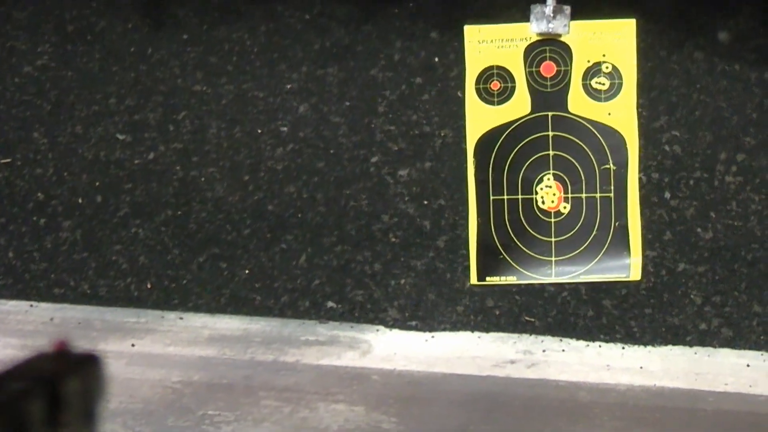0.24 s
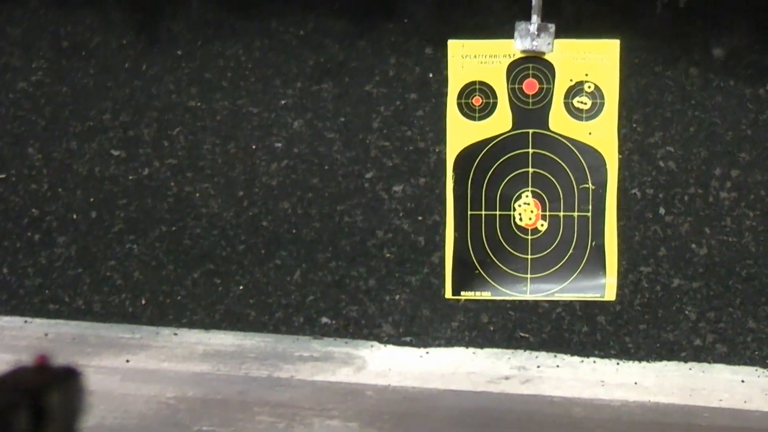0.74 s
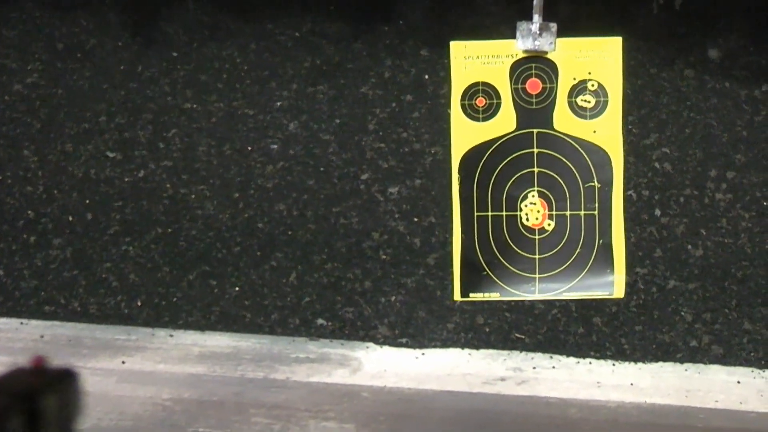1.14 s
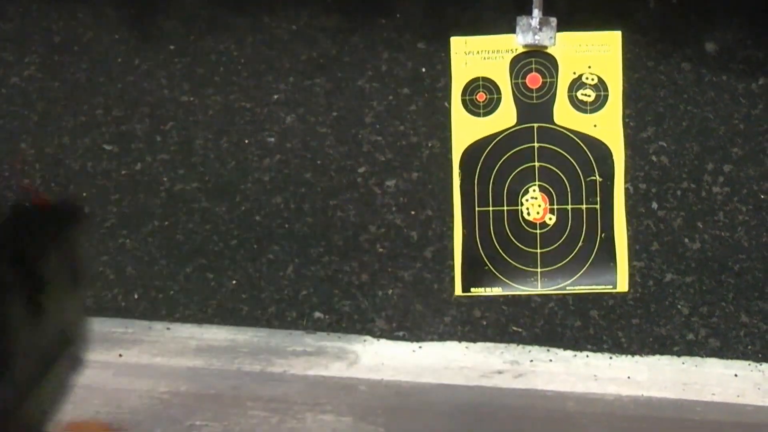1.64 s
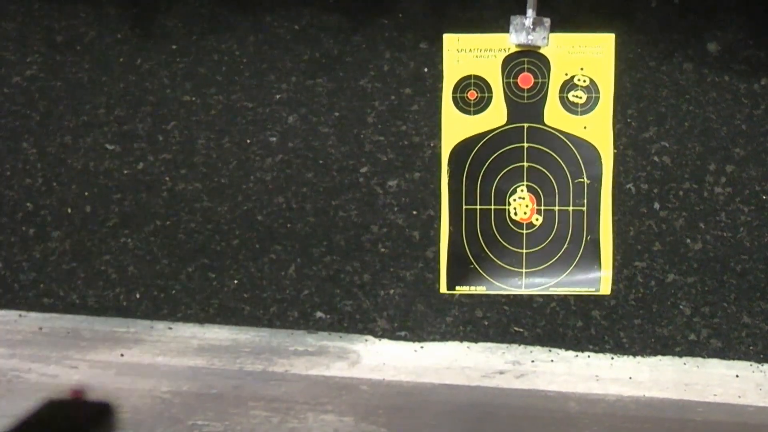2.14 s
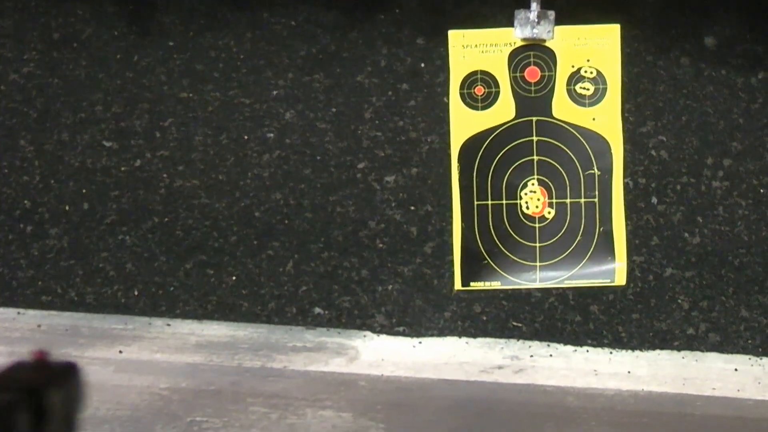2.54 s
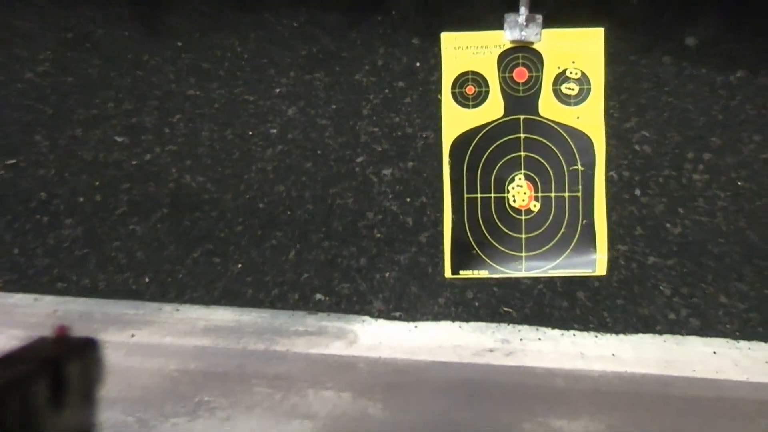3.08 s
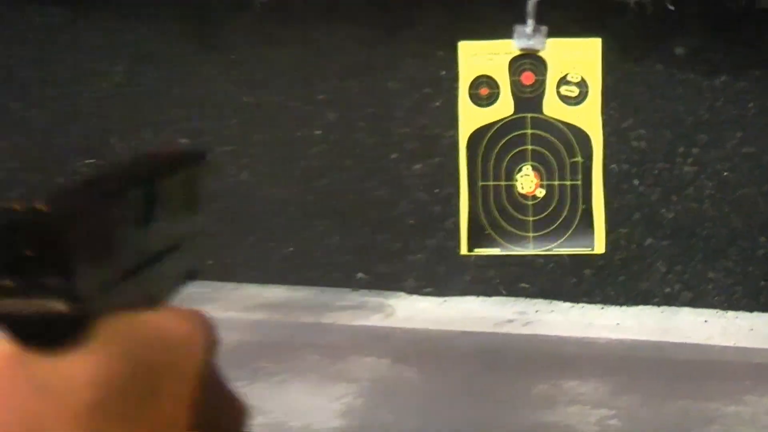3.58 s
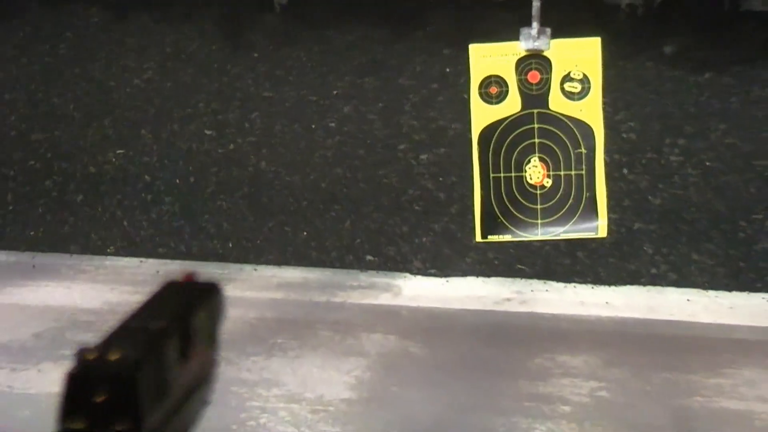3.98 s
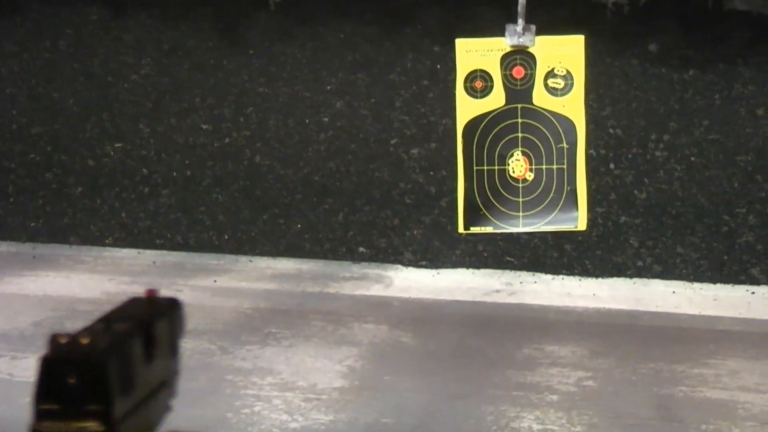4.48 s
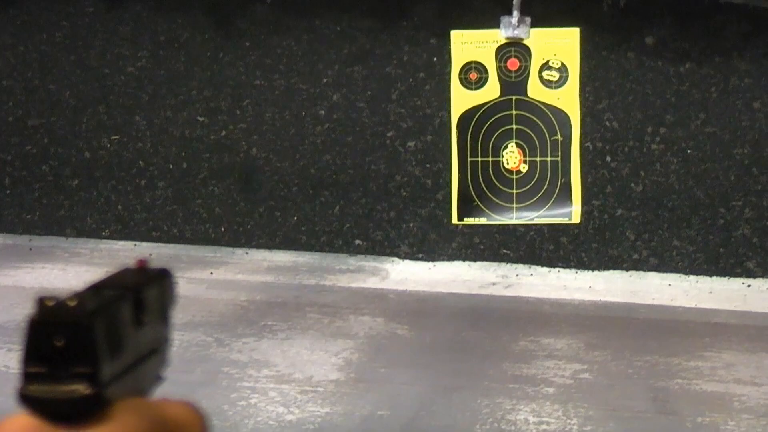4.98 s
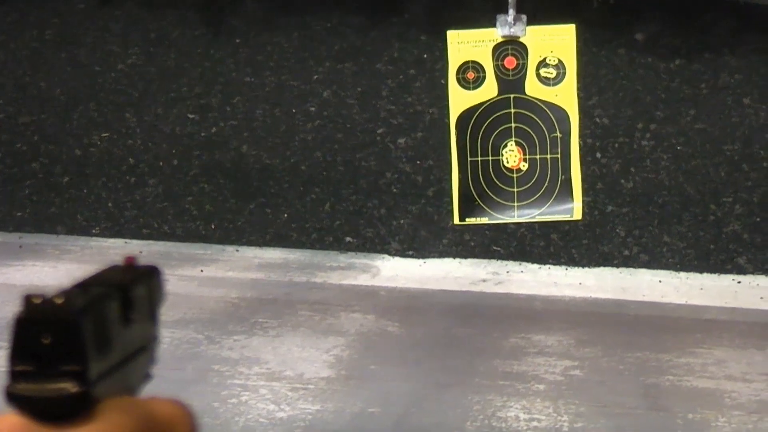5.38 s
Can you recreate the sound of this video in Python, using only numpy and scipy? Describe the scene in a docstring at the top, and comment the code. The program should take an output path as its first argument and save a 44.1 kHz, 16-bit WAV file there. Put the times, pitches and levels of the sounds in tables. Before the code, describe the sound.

Handgun blasts overload a close camera microphone, each rolling into a boomy concrete echo, with tinkling spent cases and fan hum between.

```python
"""Handgun blasts crack and roar through a long concrete range, near a camera; brass rings on the floor.
Each shot is shaped noise: crack, boom, hall roar, drone and far-wall slap, plus a sine thump.
Spent cases are noise ticks with decaying sine modes; soft bumps are low noise bursts.
Ventilation is filtered noise under a wavering fan tone.
Both microphones overload on blasts; the camera's limiter cuts the level, then releases steadily."""
import sys
import numpy as np
from scipy import signal
from scipy.fft import rfft, irfft, next_fast_len
from scipy.io import wavfile
from scipy.ndimage import uniform_filter1d, minimum_filter1d, map_coordinates

SR = 44100
rng = np.random.default_rng(int(sys.argv[2]) if len(sys.argv) > 2 else 0)


def wrap_up_sound(samples):
    """Save the sound to the file named by the first command line argument, as 16-bit audio."""
    columns = np.atleast_2d(samples).T
    # keep every value between -1 and 1, then stretch to whole-number steps
    tamed = np.clip(columns, -1, 1)
    steps = np.round(tamed * 32767).astype(np.int16)
    wavfile.write(sys.argv[1], SR, steps)


N = 247842
MATURE_S = 0.6  # reference time of the roar and drone decays
TOP_HZ = 15870  # band limit

# Shots: [t/s, level/dB common to all parts, gun]; a negative t leaves only the tail
SHOT_LIST = [(-.55, -19.5, "far"), (1.237, -15.5, "far"), (1.504, -22.5, "near"), (2.860, -15.5, "far"),
             (3.555, -26, "near"), (5.012, -15, "far")]
# Guns beside the camera and some lanes away: [bass/dB, booth/dB, build-up/s, crack/dB, boom/dB,
# thump/dB, far wall/dB]; part levels add to the shot level, negative build-up means immediate
GUN_PARTS = {"near": (-1.5, 23, -0.0071, 50, 38.5, 49, 30.5),
             "far": (-11.5, 10, 0.01, 34.5, 31.5, 37, 24.5)}


def shots():
    """A blast sends a direct front, then wall echoes and a diffuse roar, all scaled by its level."""
    out = np.zeros((2, N))
    t = np.arange(2 * SR) / SR
    for start_s, level_db, gun in SHOT_LIST:
        bass_db, booth_db, rise_s, crack_db, boom_db, thump_db, wall_db = GUN_PARTS[gun]
        # walls between gun and camera soften the front
        front = (1 - np.exp(-t / np.clip(rise_s, 1e-4, 1))) ** 3
        blast = crack(t, crack_db) + boom(t, boom_db) + thump(t, thump_db)
        hall = roar(len(t), bass_db, booth_db) + drone(t) + far_wall(t, wall_db)
        add(out, start_s, amp(level_db) * front * (blast + hall))
    return out


# Crack and far-wall colour: [f/Hz, relative density/dB]
CRACK_COLOUR = [(300, -23), (2000, -2.5), (5500, -4), (9000, -10.5), (16000, -25)]
# Likeness of first arrivals: [f/Hz, left-right correlation, clipped to -1..1]
EARLY_LIKENESS = [(60, -0.18), (180, -1.6), (550, 0.82), (1650, -0.24), (4970, 0.92), (15000, 0.38)]


def crack(t, level_db):
    """The sharp front is bright noise with a short exponential decay."""
    return amp(level_db - 60 * t / 0.23) * hiss(CRACK_COLOUR, len(t), EARLY_LIKENESS)


def far_wall(t, level_db, delay_s=0.135):
    """The far wall returns a late slap with the colour of the crack."""
    late_s = np.maximum(t - delay_s, 0)
    envelope = amp(level_db - 60 * late_s / 0.3) * (1 - np.exp(-late_s / 0.0033))
    return envelope * hiss(CRACK_COLOUR, len(t), EARLY_LIKENESS)


# Boom colour: [f/Hz, relative density/dB]
BOOM_COLOUR = [(40, -32), (120, 4), (220, -4), (350, 5), (600, -38.5), (1200, -38)]


def boom(t, level_db):
    """The low body of the blast gathers within milliseconds and outlasts the crack."""
    envelope = amp(level_db - 60 * t / 0.48) * (1 - np.exp(-t / 0.0096)) ** 2
    return envelope * hiss(BOOM_COLOUR, len(t))


def thump(t, level_db, delay_s=0.056, centre_hz=299.6, width_s=0.011):
    """A low echo is a Gaussian sine burst whose pitch and phase vary by shot."""
    hz = centre_hz * rng.normal(1, 0.061)
    tone = np.sin(2 * np.pi * (hz * t + rng.random()))
    return amp(level_db) * np.exp(-((t - delay_s) / width_s) ** 2) * tone


# Roar source colour: [f/Hz, relative density/dB]
ROAR_COLOUR = [(18, -74.5), (30, -41), (106, -12.5), (153, -4), (227, -5.5), (382, -11), (842, -2.5),
               (1250, -10), (1600, -15), (1860, -14.5), (5650, -25), (7230, -29.5), (11000, -49.5),
               (14300, -94.5), (22000, -120)]
# Hall decay: [f/Hz, t60/s]
HALL_T60 = [(60, 2), (250, 0.78), (800, 1.252), (2500, 1.17), (6000, 1.033), (11000, 0.82)]
# Hall build-up: [f/Hz, time constant/s]
HALL_SWELL = [(100, 0.019), (800, 0.035), (4000, 0.018)]


def roar(size, bass_db, booth_db):
    """Each frequency builds and dies in the hall at its own speed, in uneven lumps."""
    hz, t, bins = signal.stft(hiss(ROAR_COLOUR, size), SR, nperseg=128)
    decay = amp(-60 * (t - MATURE_S) / along(HALL_T60, hz)[:, None])
    swell = 1 - np.exp(-t / along(HALL_SWELL, hz)[:, None])
    booth = 1 + amp(booth_db - 60 * t / 1.01)  # walls around the gun add a part that dies sooner
    even = signal.istft(bins * decay * swell * booth, SR, nperseg=128)[1][:, :size]
    lumps = amp(1.1 * wobble(25.1, size))
    return lumps * filtered(even, lambda f: amp(bass_db / (1 + (f / 400) ** 2)))


# Slowest hall resonances: [f/Hz, relative density/dB]
DRONE_COLOUR = [(180, -32), (300, 2.5), (378, -22), (790, 3.5), (1380, -42), (1510, -29), (2000, -18.5),
                (2600, -55.5), (4400, -120)]


def drone(t, t60_s=1.6):
    """The slowest hall resonances linger as narrow-coloured noise."""
    return amp(-15.5 - 60 * (t - MATURE_S) / t60_s) * hiss(DRONE_COLOUR, len(t))


# Brass cases touching the floor: [t/s, tick level/dB, ring f/Hz, ring level/dB, landing]
CASE_LIST = [(.577, -48, 11450, -57.5, "free"), (1.058, -53, 11400, -61.5, "free"),
             (1.986, -30, 9000, -60, "dull"), (2.351, -34, 1900, -28, "dull"),
             (2.525, -48, 8000, -61, "dull"), (2.553, -36, 5480, -46, "dull"),
             (2.564, -37, 7970, -42, "dull"), (2.58, -37, 2300, -42, "dull"),
             (2.615, -54, 11400, -68, "free"), (2.669, -73, 8000, -52, "dull"),
             (2.818, -41, 5800, -49, "dull"), (3.43, -48, 11000, -56, "free"),
             (4.171, -25.5, 6960, -40.5, "free"), (4.23, -53, 7000, -63, "free"),
             (4.467, -55, 3530, -39, "dull"), (4.634, -52, 11000, -70, "free"),
             (4.666, -42.5, 4500, -62, "dull"), (4.726, -51, 7000, -65, "free"),
             (4.857, -44.5, 11200, -56, "free")]
# Ring decay of the base pitch by landing: [t60/s]; springing up rings on, landing flat damps
LANDING_T60 = {"free": .4, "dull": 0.039}


def cases():
    """A brass tube strikes the floor with a tick, then rings in its modes."""
    out = np.zeros((2, N))
    t = np.arange(SR) / SR
    for start_s, tick_db, ring_hz, ring_db, landing in CASE_LIST:
        ring = case_ring(t, ring_hz, ring_db, LANDING_T60[landing])
        add(out, start_s, case_tick(t, tick_db, ring_hz) + ring)
    return out


# Tick colour: [f/tick centre, relative density/dB]
TICK_COLOUR = [(.2, -29), (.6, -1), (1, -1), (1.6, -3), (3, -12), (6, -67)]


def case_tick(t, level_db, ring_hz):
    """Impact noise has a fast part and weaker scatter; its centre climbs with the ring pitch."""
    centre_hz = 5000 * (ring_hz / 7000) ** 0.45
    colour = [(ratio * centre_hz, db) for ratio, db in TICK_COLOUR]
    decay = amp(-60 * t / 0.012) + amp(-8.5 - 60 * t / 0.14)
    return amp(level_db) * (1 - np.exp(-t / 0.0016)) * decay * hiss(colour, len(t))


# Case modes: [f/ring f, relative level/dB]
CASE_MODES = [(1.001, 7), (1.3, -22), (1.48, -23), (1.76, -16), (1.92, -17)]


def case_ring(t, hz, level_db, t60_s):
    """Tube modes decay faster with pitch; those above the band limit are left out."""
    # a rolling case blurs its note
    drift_s = np.cumsum(rng.normal(0, 2e-6, (2, len(t))), axis=1)
    cycles = hz * (t + drift_s)
    modes = 0
    for ratio, db in CASE_MODES:
        if ratio * hz < TOP_HZ:
            modes = modes + amp(db - 60 * t * ratio / t60_s) * np.sin(2 * np.pi * ratio * cycles)
    return amp(level_db + 5.7 * wobble(42, len(t))) * (1 - np.exp(-t / 0.0033)) * modes


# Dull bumps, perhaps hands shifting on the camera: [t/s, level/dB]
BUMP_LIST = [(1.033, -38), (1.07, -38), (1.117, -36), (1.145, -43), (1.20, -47), (4.61, -50), (4.88, -44),
             (4.925, -45), (4.965, -45)]
# Bump colour: [f/Hz, relative density/dB]
BUMP_COLOUR = [(40, -25), (110, 5), (200, -4), (500, -24), (1000, -29), (5000, -25), (12000, -70)]


def bumps(rise_s=0.006, t60_s=0.075):
    """Soft low pushes are short noise bursts without a ring."""
    out = np.zeros((2, N))
    t = np.arange(SR // 4) / SR
    for start_s, level_db in BUMP_LIST:
        envelope = amp(level_db - 60 * t / t60_s) * (1 - np.exp(-t / rise_s))
        add(out, start_s, envelope * hiss(BUMP_COLOUR, len(t)))
    return out


# Background swell: [t/s, hum level/dB]
HUM_LEVEL = [(.7, -58), (1.0, -55.5), (1.06, -51), (1.2, -47), (2.5, -42), (2.75, -42), (4.5, -46),
             (4.8, -49.5), (4.95, -43)]


def background():
    """Ventilation noise swells and sinks; the low rumble follows part of its swings."""
    hum_db = np.interp(np.arange(N) / SR, *np.transpose(HUM_LEVEL))
    return amp(hum_db) * ventilation() + rumble(hum_db)


# Ventilation colour: [f/Hz, relative density/dB]
AIR_COLOUR = [(130, -17), (220, -4), (447, -4.5), (484, -8), (584, 1), (866, -2), (1530, -15.5),
              (5220, -33), (9500, -44), (12400, -69), (20900, -120)]
# Rustle colour: [f/Hz, relative density/dB]
RUSTLE_COLOUR = [(800, -25), (2000, 7), (5000, -1), (8000, -7), (12000, -26.5)]


def ventilation(rustle_db=-12):
    """Ventilation hum is coloured noise with a lighter rustle above."""
    return hiss(AIR_COLOUR, N) + amp(rustle_db) * hiss(RUSTLE_COLOUR, N)


# Low rumble colour: [f/Hz, relative density/dB]
DUCT_COLOUR = [(12, -83), (20, -52), (49, -11), (108, -9), (156, -12), (230, -18), (300, -53), (510, -120)]
# Fan tone: [f/Hz, level/dB before normalising]
FAN_TONES = [(145.3, -59.5)]


def rumble(hum_db, mean_db=-50.5, follow_db_per_db=0.41, waver_db=5):
    """Low noise carries a fan tone that wavers in level and phase."""
    t = np.arange(N) / SR
    tones = 0
    for hz, db in FAN_TONES:
        level = amp(db + waver_db * wobble(3.2, N))
        tones = tones + level * np.sin(2 * np.pi * hz * t + 1.8 * wobble(8.8, N))
    mix = unit(hiss(DUCT_COLOUR, N) + amp(-3.5) * unit(tones))
    return amp(mean_db + follow_db_per_db * (hum_db - hum_db.mean())) * mix


# Hall likeness: [f/Hz, left-right correlation]
HALL_LIKENESS = [(60, 0.99), (150, 1), (380, 0.99), (950, 0.93), (2380, 0.69), (5980, 0.77), (15000, 0.15)]
# Hall lean: [f/Hz, left minus right/dB]
HALL_LEAN = [(60, 1), (180, -0.5), (550, 1.5), (1650, 0.5), (4970, -1), (15000, 0)]


def hiss(spectrum, size, likeness=HALL_LIKENESS):
    """Stereo noise of rms 1: mid-side mixing sets correlation, opposite gains set lean."""
    def mid_side(hz):
        angle = np.arccos(np.clip(along(likeness, hz), -1, 1)) / 2
        return amp(along(spectrum, hz)) * [np.cos(angle), np.sin(angle)]

    def lean(hz):
        half_db = along(HALL_LEAN, hz) / 2
        return amp([half_db, -half_db])

    mid, side = filtered(rng.standard_normal((2, size)), mid_side)
    return unit(filtered(np.array([mid + side, mid - side]), lean))


def wobble(knots_per_s, size):
    """A smooth random curve through Gaussian knots."""
    knots = rng.standard_normal(int(size * knots_per_s / SR) + 4)
    return map_coordinates(knots, [np.arange(size) * knots_per_s / SR])


def amp(db):
    """dB to amplitude."""
    return 10 ** (np.asarray(db) / 20)


def unit(x):
    """Scale to rms 1."""
    return x / np.sqrt(np.mean(x ** 2) + 1e-20)


def along(points, hz):
    """Interpolate (f/Hz, value) points on a log-frequency axis."""
    f, v = np.transpose(points)
    return np.interp(np.log(hz + 1), np.log(f + 1), v)


def filtered(x, response):
    """Multiply the spectrum by a response of frequency, with zero padding."""
    size = next_fast_len(x.shape[-1] + 8192)
    spectrum = rfft(x, size) * response(np.fft.rfftfreq(size, 1 / SR))
    return irfft(spectrum, size)[..., :x.shape[-1]]


def add(out, start_s, sound):
    """Mix in a sound, trimmed at both ends of the scene."""
    at = round(start_s * SR)
    piece = sound[:, max(0, -at):][:, :N - max(0, at)]
    out[:, max(0, at):][:, :piece.shape[1]] += piece


def scene():
    """Sum everything that reaches the microphones."""
    return shots() + cases() + bumps() + background()


def limiter(x, ceiling_db, hold_s, release_db_per_s, smooth_s, overreact, settle_s):
    """One gain for both channels overshoots at sudden peaks, settles and releases steadily."""
    peak_db = 20 * np.log10(np.abs(x).max(axis=0) + 1e-9)
    over_db = np.maximum(peak_db - ceiling_db, 0)
    held_db = -minimum_filter1d(-over_db, max(1, round(hold_s * SR)))  # centred window
    ramp_db = release_db_per_s * np.arange(N) / SR
    released_db = np.maximum.accumulate(held_db + ramp_db) - ramp_db
    keep = np.exp(-1 / (settle_s * SR))
    settled_db = signal.lfilter([1 - keep], [1, -keep], released_db)
    cut_db = released_db + overreact * np.maximum(released_db - settled_db, 0)
    return x * amp(-uniform_filter1d(cut_db, max(1, round(smooth_s * SR))))


def widened(x, lift_db, corner_hz):
    """Close microphones differ little in the bass, so the camera lifts their difference there."""
    mid, side = (x[0] + x[1]) / 2, (x[0] - x[1]) / 2
    side = filtered(side, lambda hz: 1 + (amp(lift_db) - 1) / (1 + 1j * hz / corner_hz))
    return np.array([mid + side, mid - side])


# Microphone travel limits: one row each for left and right, [level/dB]
MIC_LIMIT_DB = [
    [7.5],
    [6],
]
# Clipping-point wander: [f/Hz, relative density/dB]
FLUTTER_COLOUR = [(20, -29), (60, -5), (130, 14), (400, 11), (2000, -16), (8000, -15), (16000, -31)]


def overload(dry):
    """Each microphone saturates around a wandering rest point that shows only in overloads."""
    def squash(u):
        return u / (1 + np.abs(u) ** 6.88) ** (1 / 6.75)

    top = amp(MIC_LIMIT_DB)
    rest = 0.11 * hiss(FLUTTER_COLOUR, N, [(100, -0.2)])
    return top * (squash(dry / top + rest) - squash(rest))


def amplifier(hz):
    """Response with a bass cut, a presence lift and a gentle treble roll-off."""
    bass_cut = (1j * hz / (50 + 1j * hz)) ** 3
    presence = 1 + 0.083 * 1j * hz * 5000 / (5500 ** 2 - hz ** 2 + 1j * hz * 5000)
    return bass_cut * presence / (1 + 1j * hz / 8000)


def record(dry):
    """Microphone overload, limiter, widening, amplifier, hard clip, band limit."""
    level = limiter(overload(dry), ceiling_db=-6.0, hold_s=0.00083, release_db_per_s=105,
                    smooth_s=0.001, overreact=1.0, settle_s=0.0051)
    thin = filtered(widened(level, lift_db=12, corner_hz=200), amplifier)
    return filtered(np.clip(thin, -1, 1), lambda hz: 1 / (1 + (hz / TOP_HZ) ** 300))


dry = scene()
out = record(dry)
wrap_up_sound(out)
```